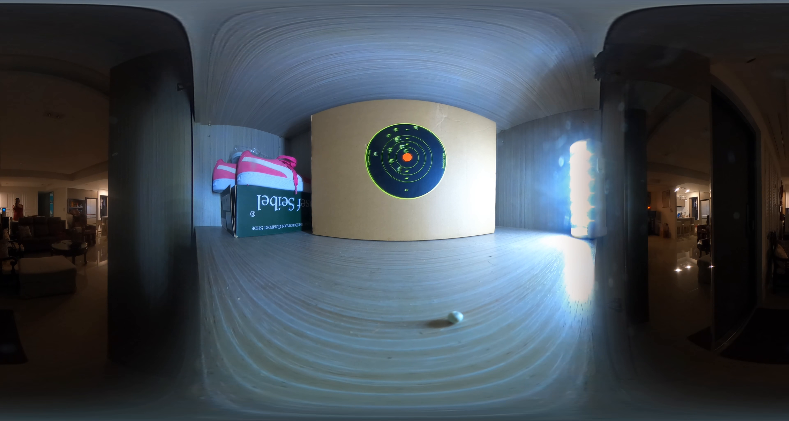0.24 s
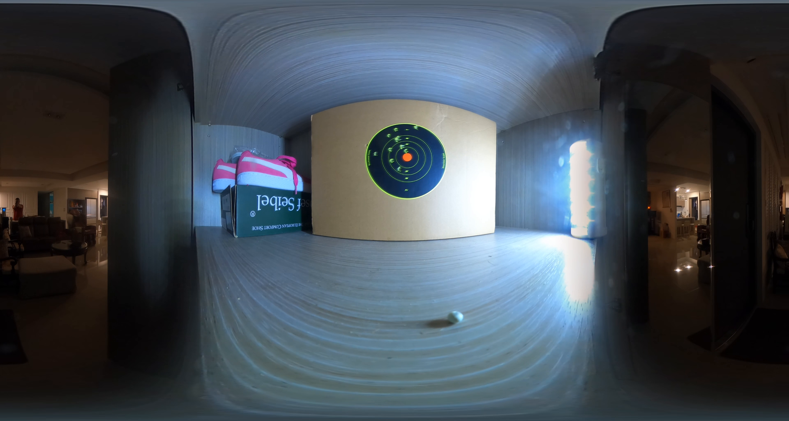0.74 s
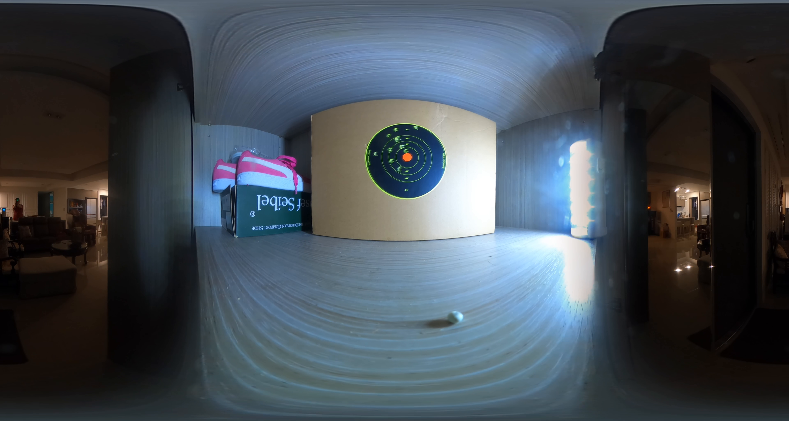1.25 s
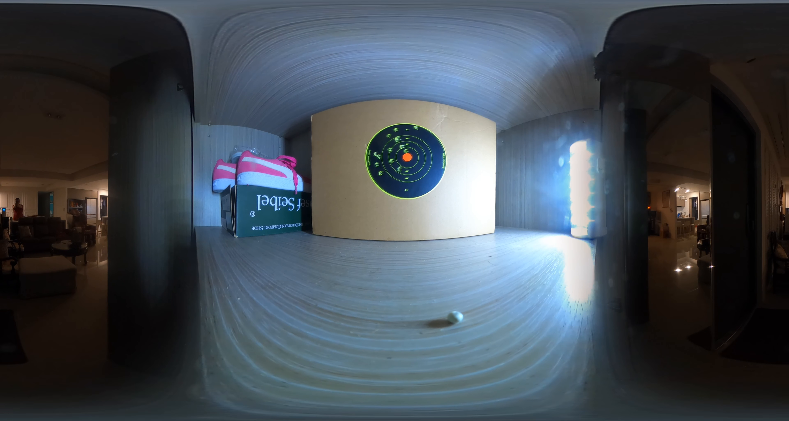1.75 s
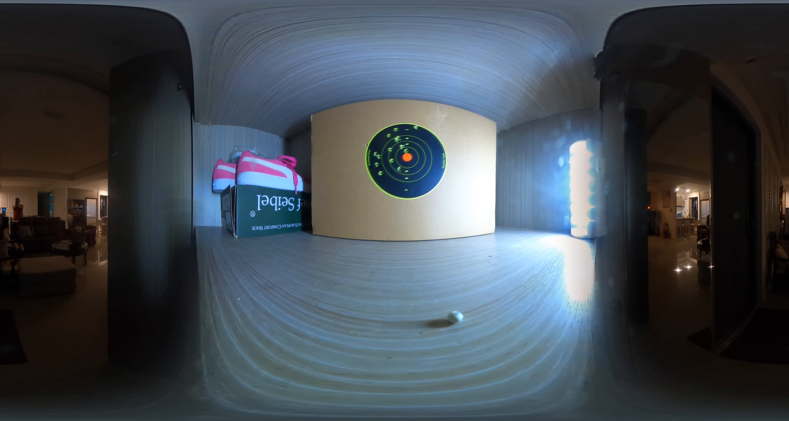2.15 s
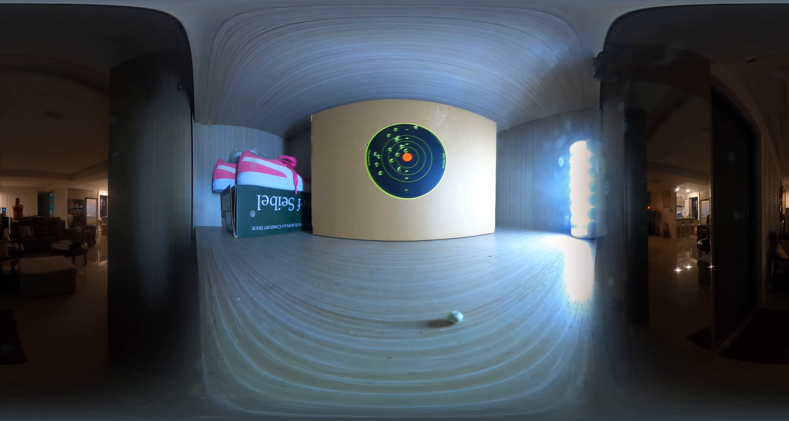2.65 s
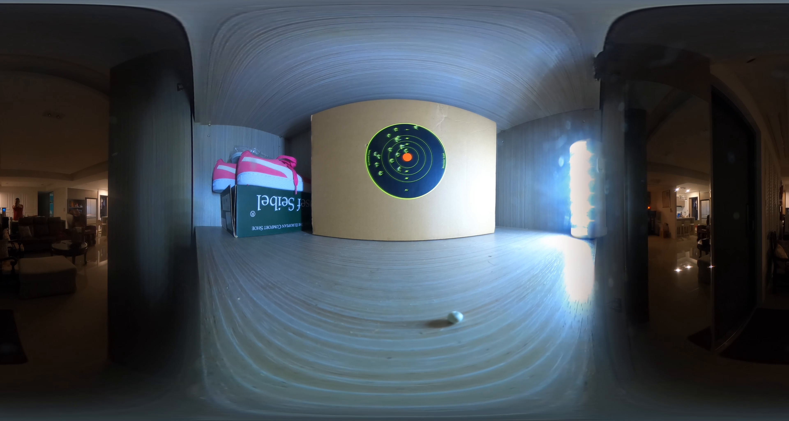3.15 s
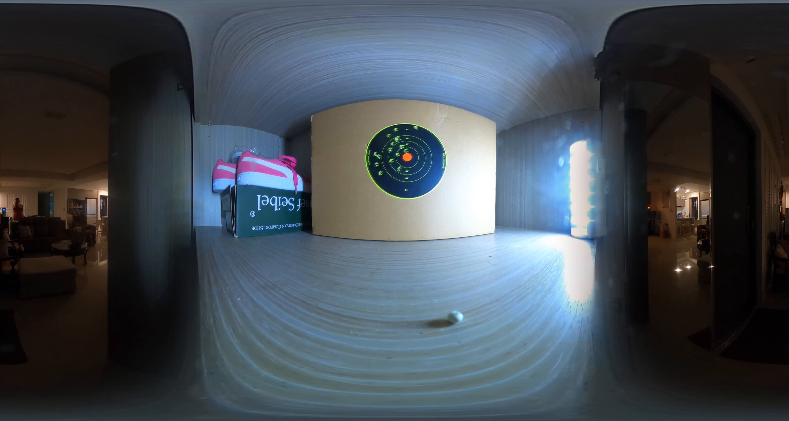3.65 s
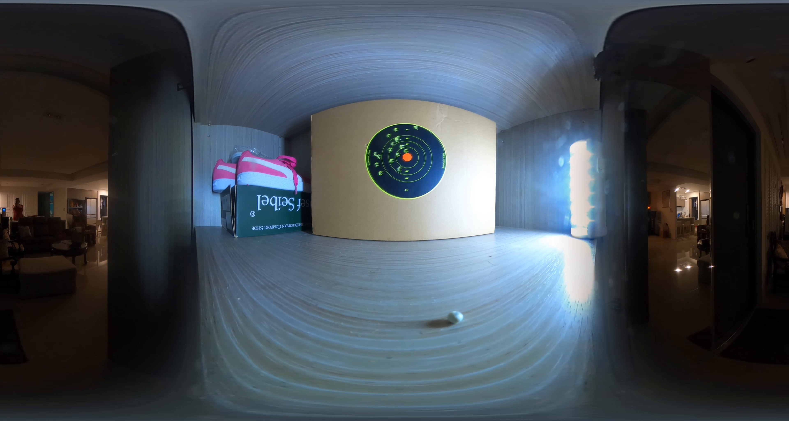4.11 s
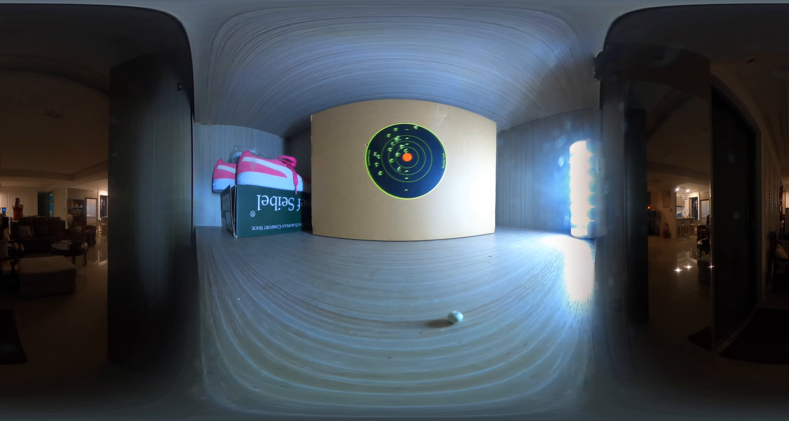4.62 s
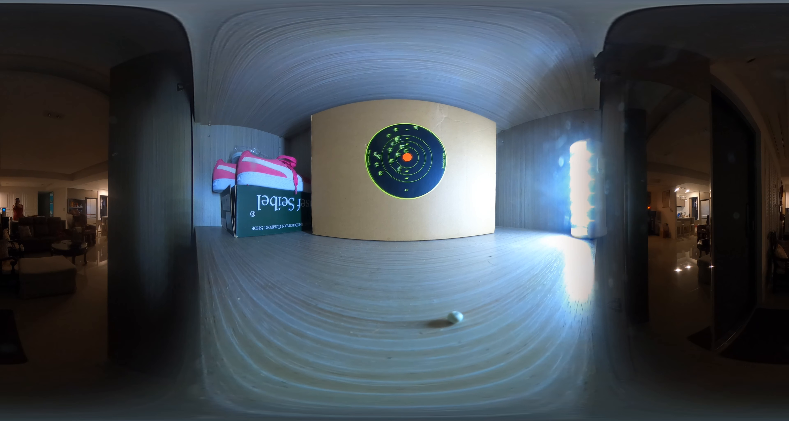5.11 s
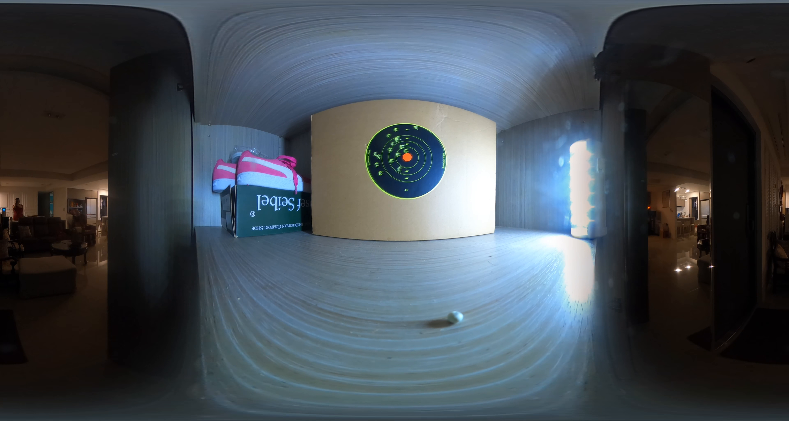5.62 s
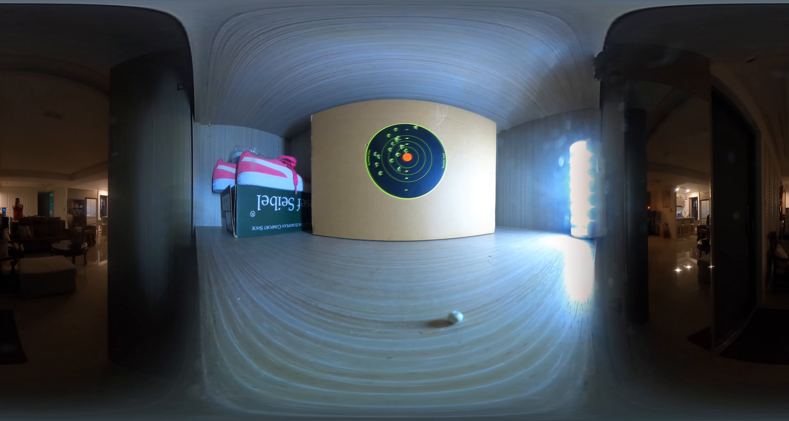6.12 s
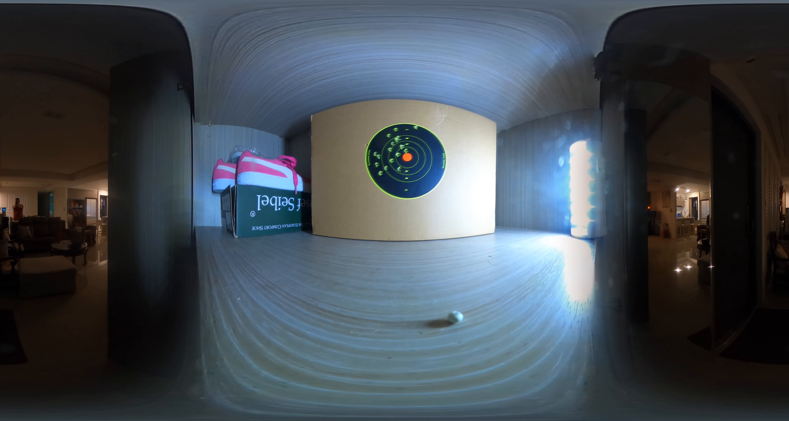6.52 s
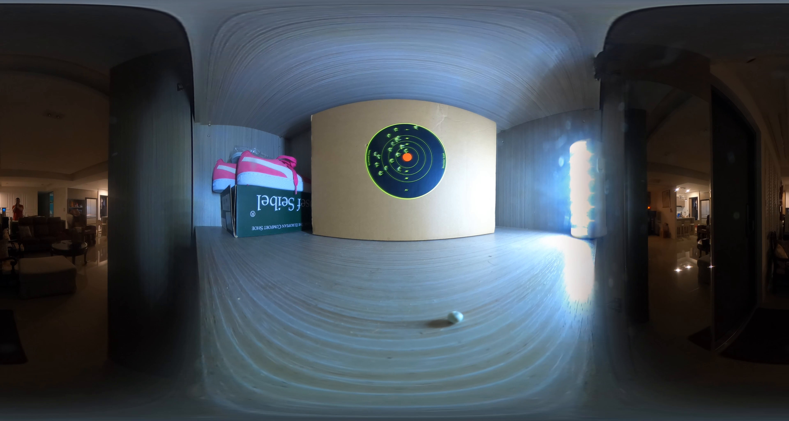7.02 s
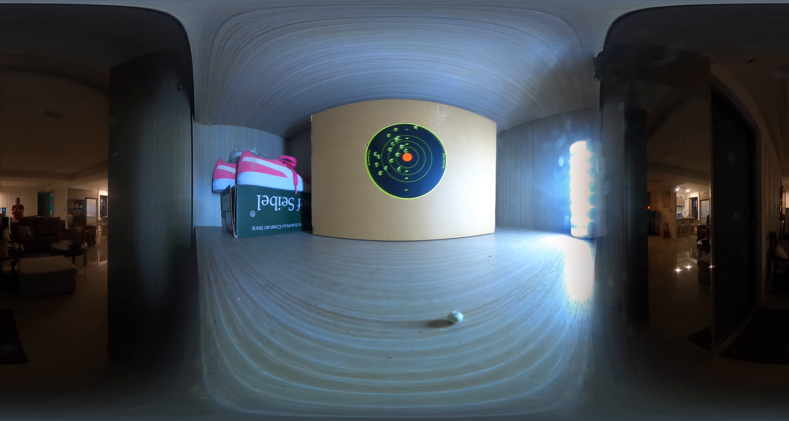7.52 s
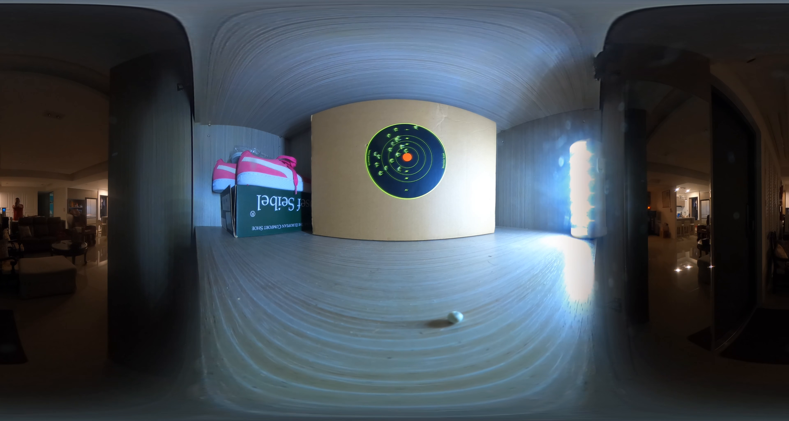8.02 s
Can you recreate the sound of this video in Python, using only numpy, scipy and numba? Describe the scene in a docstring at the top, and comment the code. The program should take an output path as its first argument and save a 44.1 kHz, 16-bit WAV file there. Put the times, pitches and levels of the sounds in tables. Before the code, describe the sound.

A quiet house interior with soft low air noise, faint steady hum and swelling deep rumble, the last trace of an earlier shot fading at the start. A soft low drone climbs around 0.6-1.4 s. Airsoft shots come at about 1.4, 1.6, 1.8, 2.4, 3.7, 4.6 and 6.5 s. Each is a dull, slightly metallic pop with a small rattle, then about 0.05 s later a very loud, dry paper crack and hollow cardboard boom, clipped at the close microphone. The room tail ducks and swells back, dying in about half a second. Pellets knock and bounce on a board from 2.0 to 3.3 s, brightest around 2.5-2.8, with a faint roll dulling until 3.7; a few soft taps follow near 4 and 4.8-5 s. Another low drone rises at 5.2-6.5 s. After the last hit, only rumble and slowly lifting hum remain until 8.3 s.

```python
"""An airsoft gun fires across a living room at a paper target on a cardboard box beside a small camera.
Each shot is a dull muzzle pop, then the pellet's snap on the box, built from fading noise and ringing tones.
Spent pellets bounce and roll on a board; air noise, hum, rumble and low drones lie underneath.
The camera limits the snaps, so the room tail dips and swells back, and slowly lifts the hum afterwards."""
import sys
import numpy as np
from scipy import signal
from scipy.io import wavfile
from scipy.ndimage import uniform_filter1d
from numba import njit

SR = 44100
rng = np.random.default_rng(int(sys.argv[2]) if len(sys.argv) > 2 else 0)


def wrap_up_sound(samples):
    """Save the sound to the file named by the first command line argument, as 16-bit audio."""
    columns = np.atleast_2d(samples).T
    # keep every value between -1 and 1, then stretch to whole-number steps
    tamed = np.clip(columns, -1, 1)
    steps = np.round(tamed * 32767).astype(np.int16)
    wavfile.write(sys.argv[1], SR, steps)


N = 364247  # length in samples
LEAD = SR // 2  # samples worked out before the start, for an earlier shot's tail
THIRDS = 50 * 2 ** np.arange(0, 8.4, 1 / 3)  # middles of the noise bands in Hz, a third of an octave apart

# All levels are those before the camera's gain.
# The shots. Each row: muzzle pop in seconds, pellet on target in seconds, pop level in dB,
# shell thump in dB, paper crack peak in dB, box boom in dB, boom tilt in dB an octave.
SHOTS = [(-.40, -0.358, -30, -12, 21.5, -2.5, 0), (1.3562, 1.3994, -13, -8.5, 20.5, 11, -3),
         (1.5994, 1.646, -11.5, -7, 20.5, 14, -3.5), (1.7764, 1.8224, -15, -11.5, 22, 15, -0.5),
         (2.4047, 2.4495, -11.5, -14, 22.5, 15, 4), (3.676, 3.7223, -11.5, -12, 21.5, 15.5, 3.5),
         (4.5692, 4.6145, -10.5, -14, 23, 13, 0.5), (6.4861, 6.5339, -13, -9.5, 23.5, 17.5, -3.5)]
# Pellet bounces on the board. Each row: start in seconds, peak in dB, hardness (0 soft to 1 hard).
BOUNCES = [(1.984, -6.5, 0.8), (2.127, -22.5, 0.02), (2.1601, -10, 0.14), (2.258, -28, 0),
           (2.2731, -15, 0.49), (2.3464, -15.5, 0.67), (2.385, -27, 0.16), (2.474, 0, 0.3),
           (2.558, -11.5, 0.5), (2.61, -8, 0.8), (2.673, -5, 0.7), (2.808, -14.5, 0.7), (2.824, -6, 1),
           (2.938, -11, 0.66), (3.001, -13, 0.96), (3.024, -19.5, 0.7), (3.08, -33, 0.7), (3.106, -29, 0.7),
           (3.156, -26.5, 0.6), (3.265, -35.5, 0.4), (3.595, -44, .5), (3.914, -19.5, 0),
           (3.971, -28.5, 0.3), (4.014, -24.5, 0), (4.041, -27.5, 0.02), (4.078, -36, 0.07),
           (4.744, -25, 0), (4.80, -24, 0), (5.044, -34.5, 0)]
# Crack of the paper, too dense for single tones; it also colours the faint noise before each pop.
# Each row: frequency in Hz, relative level in dB, time to fall by 60 dB in seconds.
PAPER_CRACK = [(300, -4.5, 0.037), (570, -10.5, 0.04), (925, 2, .03), (1380, -10, 0.036), (2160, 3, 0.016),
               (3030, 1, 0.017), (3870, -5.5, 0.015), (6100, -14, .012), (9200, -24.5, 0.022),
               (15000, -30.5, .006)]
# Ringing tones of the barrel, and of the cardboard box.
# Each row: frequency in Hz, relative level in dB, time to fall by 60 dB in seconds.
BARREL_TONES = [(438.5, -6, 0.052), (820, -0.5, 0.013), (1472.4, -3, 0.06), (2099, 1, 0.084),
                (3350, -5.5, 0.052), (4270, -7.5, 0.017)]
BOX_TONES = [(60, -9, 0.12), (123, 0, 0.029), (188, 0.5, .06), (88.75, -2.5, 0.29), (103.5, -7.5, 0.24),
             (129, -11, 0.27), (159.7, -1, 0.19), (220, -3.5, 0.083), (246, 4.5, 0.093),
             (300.5, -9.5, 0.081), (410, -12.5, .06), (494, -16.5, 0.093)]


def undb(db):
    """Turn decibels into a gain."""
    return 10 ** (np.asarray(db) / 20)


def level(x, db):
    """Scale a sound to an average (rms) level."""
    return x * undb(db) / np.sqrt(np.mean(x ** 2))


def peak(x, db):
    """Scale a sound so that its highest point has this level."""
    return x * undb(db) / np.abs(x).max()


def column(table, hz, k):
    """Read column k of a frequency table, filling in between rows on a log frequency axis."""
    rows = np.array(table)
    return np.interp(np.log(np.maximum(hz, 1)), np.log(rows[:, 0]), rows[:, k])


def add(track, s, x):
    """Mix a sound into the track at a time in seconds."""
    i = int(s * SR) + LEAD
    track[i:i + len(x)] += x[:len(track) - i]


def walk(rate):
    """A smooth random wander: a new value is drawn rate times a second, then smoothed twice."""
    k = int(SR / rate)
    steps = np.repeat(rng.standard_normal(N // k + 1), k)
    return 0.43 * uniform_filter1d(uniform_filter1d(steps, k), k)[:N]


def noise_band(low_hz, high_hz, order, samples):
    """Random noise kept only between two frequencies."""
    sos = signal.butter(order, [low_hz, high_hz], "band", fs=SR, output="sos")
    return signal.sosfilt(sos, rng.standard_normal(samples))


def bands():
    """Unrelated third-octave noises, two seconds each, from which the bursts are cut."""
    noises = [noise_band(hz / 1.14, hz * 1.14, 2, 2 * SR) for hz in THIRDS]
    return np.array(noises, dtype=np.float32)


def burst(noises, table, length_s, rise_s, hold_s=0., tilt_db=0.):
    """Noise whose bands die at their own rates after a hold; tilt in dB an octave acts above 700 Hz."""
    t = np.arange(int(length_s * SR), dtype=np.float32) / SR
    start = rng.integers(0, SR)
    db = column(table, THIRDS, 1) + tilt_db * np.log2(np.maximum(THIRDS / 700, 1))
    power = np.sum(undb(2 * db) * np.var(noises[:, ::41], axis=1))
    gain = np.float32(undb(db) / np.sqrt(power))  # rms 1 before the rise and fade
    rate = np.float32(np.log(1000) / column(table, THIRDS, k=2))
    fade = np.exp(-rate[:, None] * np.maximum(t - np.float32(hold_s), 0))
    rise = 1 - np.exp(-t / max(rise_s, 1e-5))
    return gain @ (noises[:, start:start + len(t)] * fade) * rise


def ring(modes, scatter_db, push_s, length_s, detune=.015):
    """One blow: a short rough contact sets off dying tones, each with chance strength and pitch; peak 1."""
    hz, db, t60 = np.transpose(modes)[:, :, None]
    chance = rng.standard_normal((len(modes), 2))
    t = np.arange(int(length_s * SR)) / SR
    hz = hz * (1 + detune * chance[:, :1])
    strength = undb(db + scatter_db * chance[:, 1:])
    body = np.sum(strength * np.sin(2 * np.pi * hz * t) * 1000. ** (-t / t60), axis=0)
    push = (1 + 0.47 * rng.standard_normal(400)) * np.exp(-t[:400] / max(push_s, 1e-5))
    out = np.convolve(body, push)
    return out / np.abs(out).max()


def room(noises, wet_db, length_s, rise_s=.003):
    """The blurred tail after a blow: reflections thicken, then each band dies at its own rate."""
    # Room tail. Each row: frequency in Hz, relative level in dB, time to fall by 60 dB in seconds.
    tail = [(80, 5, 0.47), (210, 8.5, 0.65), (401.3, -4, 0.67), (650, -9, 0.59), (930, -2, 0.67),
            (1500, -3.5, .58), (2300, 0, 0.71), (3200, -2, 0.62), (4500, -8.5, 0.69), (7200, -13.5, 0.58),
            (10800, -22.5, .42), (15100, -33, .36)]
    return undb(wet_db) * burst(noises, tail, length_s, rise_s)


def muzzle_pop(noises, db):
    """The muzzle cracks as a short noise while the barrel rings."""
    # Muzzle crack, too dense for single tones.
    # Each row: frequency in Hz, relative level in dB, time to fall by 60 dB in seconds.
    muzzle = [(200, 0.5, 0.014), (400, -1.5, 0.029), (565, -15, 0.019), (790, 0, 0.17), (1480, -6.5, 0.012),
              (2110, -3.5, 0.037), (2980, -9.5, 0.019), (4860, -3.5, 0.074), (6532, -10, 0.1),
              (9600, -13, .02), (15000, -28.5, .02)]
    barrel_db = 4
    crack = 0.86 * burst(noises, muzzle, .06, 0.00058, 0.0038)
    barrel = undb(barrel_db) * ring(BARREL_TONES, 1.2, 0.00034, 0.051)
    return undb(db) * (crack + barrel[:len(crack)])


def rattle(out, s, db):
    """Loose parts knock on the barrel after the pop, at uneven moments and strengths."""
    rattle_db, scatter_db = -7, 6  # typical strength relative to the pop, and its spread
    span_s, knocks = .04, 5
    for k in range(knocks):
        when = span_s * (k + 1 + rng.random()) / (knocks + 1)
        knock_db = db + rattle_db + scatter_db * rng.standard_normal()
        add(out, s + when, undb(knock_db) * ring(BARREL_TONES, 12, 0.00011, 0.028))


def gun(noises):
    """A faint noise swells in, then the pop and the shell's thump; parts rattle; walls repeat the pop, duller."""
    # Ringing tones of the shell.
    # Each row: frequency in Hz, relative level in dB, time to fall by 60 dB in seconds.
    shell = [(59, -9.5, 0.12), (96, 0, 0.21), (148.3, -5, 0.3), (287, -6, 0.11)]
    # First walls to return the pop. Each row: delay in seconds, level relative to the pop in dB.
    echoes = [(0.0134, -1.5), (.022, -4), (.031, 0), (.038, -5.5)]
    lead_in_db, lead_in_s = -14.5, .008  # short faint noise that swells into the pop
    wet_db = -5.5  # room tail relative to the pop
    out = np.zeros(N + LEAD)
    for s, _, db, thump_db, *_ in SHOTS:
        pop = muzzle_pop(noises, db)
        lead_in = burst(noises, PAPER_CRACK, lead_in_s, 1e-5)[::-1]  # a fading burst, turned backwards
        add(out, s - lead_in_s, undb(db + lead_in_db) * lead_in)
        add(out, s, pop)
        add(out, s, undb(thump_db) * ring(shell, 2.8, .00064, .25))
        add(out, s, room(noises, db + wet_db, .9, rise_s=.012))
        for lag, echo_db in echoes:
            add(out, s + lag, undb(echo_db) * uniform_filter1d(pop, size=3))
        rattle(out, s, db)
    return out


def target(noises):
    """The paper cracks for a few milliseconds; the loose box booms deeper or higher with the place hit."""
    wet_db = -37.5  # room tail relative to the crack's peak
    out = np.zeros(N + LEAD)
    for _, s, _, _, db, boom_db, tilt_db in SHOTS:
        add(out, s, peak(burst(noises, PAPER_CRACK, 0.055, .0001, 0.001), db))
        struck = [(hz, mode_db + tilt_db * np.log2(hz / 150), t60) for hz, mode_db, t60 in BOX_TONES]
        add(out, s + 0.003, undb(boom_db) * ring(struck, 2.2, 0.00019, .4, detune=.06))
        add(out, s, room(noises, db + wet_db, .9))
    return out


def pellets(noises):
    """Bounces knock on the board; softer contacts are duller and deeper and also sound the box."""
    # Noise of a contact with the board, then the ringing tones of its knock.
    # Each row: frequency in Hz, relative level in dB, time to fall by 60 dB in seconds.
    board = [(90.37, -31, .05), (170, -10.5, 0.1), (297.5, -5.5, 0.056), (557, 7.5, 0.058),
             (890, 0.5, 0.046), (1503, 4, 0.032), (2010, -5.5, 0.021), (2880, -5.5, 0.035),
             (3800, -15, 0.028), (5980, -28, .02), (11970, -49, 0.011)]
    knock = [(294, -8, 0.051), (650, -1.5, 0.02), (950, -3.5, 0.013), (1460, 5.5, 0.026),
             (1880, -1.5, 0.043), (2760, -8, 0.016)]
    wet_db, knock_db = -40, -9.5  # relative to the bounce
    thud_db, thud_db_per_hardness = -3.5, -35.5
    out = np.zeros(N + LEAD)
    for s, db, hard in BOUNCES:
        contact = burst(noises, board, .08, .0002, 0.00065, tilt_db=-8 * (0.48 - hard))
        add(out, s, peak(contact, db))
        add(out, s, room(noises, db + wet_db, 0.38))
        push_s = 0.00017 * (1.2 - min(hard, 1))  # a soft contact lasts longer
        add(out, s, undb(db + knock_db) * ring(knock, 3, push_s, .08))
        thud = ring(BOX_TONES, 2, 0.0004, 0.11)
        thud = thud * np.exp(-np.arange(len(thud)) / SR / 0.014)
        add(out, s, undb(db + thud_db + thud_db_per_hardness * hard) * thud)
    return out


def roll(start_s):
    """A rolling pellet: a bumpy rain of tiny contacts in the board's resonances, stirred by each hop."""
    # Resonances under the pellet. Each row: frequency in Hz, width in Hz, relative level in dB.
    resonances = [(522.4, 89, 2.5), (666.5, 180, 3), (1000, 140, -1.5), (1240, 120, 1.5), (1500, 150, 0),
                  (1870, 120, -4.5), (2372, 120, -15)]
    end_s, settle_s = 3.70, 0.051
    hop_db, steady_db = -45, -49  # just after a hop, and between hops
    tilt_db_oct, dulling_db_oct_s = 8.5, -25.5  # treble tilt at the start, and its change each second
    t = np.arange(int((end_s - start_s) * SR)) / SR
    grit = rng.standard_normal(N) * undb(2.5 * rng.exponential(size=N))
    bumps = undb(2 * walk(58.58))
    grit = (grit * bumps)[:len(t)]
    tilt_db, out = tilt_db_oct + dulling_db_oct_s * t, 0
    for hz, width, db in resonances:
        b, a = signal.iirpeak(hz, hz / width, fs=SR)
        tone = signal.lfilter(b, a, signal.lfilter(b, a, grit))  # twice: steep skirts
        out = out + undb(db + tilt_db * np.log2(hz / 600)) * tone
    hops = [s - start_s for s, _, _ in BOUNCES if start_s - .01 < s < end_s]
    stir = np.max([(t > s) * np.exp(-np.abs(t - s) / settle_s) for s in hops], axis=0)
    return level(out, 0) * undb(steady_db + (hop_db - steady_db) * stir)


def drones():
    """Soft wavering low tones that swell, climb in pitch and fade out."""
    # Each row: start in seconds, length in seconds, first pitch in Hz, last pitch in Hz,
    # rms level at the top of the swell in dB, before the wavering.
    tones = [(0.603, .8, 58.4, 72.16, -51), (5.15, 1.35, 46.6, 66.23, -48)]
    out, waver = np.zeros(N + LEAD), undb(2.3 * walk(4.6))
    for s, length_s, from_hz, to_hz, db in tones:
        u = np.arange(int(length_s * SR)) / (length_s * SR)  # runs from 0 to 1
        hz = from_hz + (to_hz - from_hz) * np.sqrt(u)
        swell = np.sqrt(np.sin(np.pi * u))
        add(out, s, np.sqrt(2) * undb(db) * swell * np.sin(2 * np.pi * np.cumsum(hz) / SR))
    return out[LEAD:] * waver


def air_noise():
    """Steady noise in half-octave bands whose levels flicker gently."""
    # Tone colour of the air noise. Each row: frequency in Hz, relative level in dB per Hz.
    colour = [(41, -31), (66, -15.5), (95, -9), (190, -23.5), (330, -24), (541, -37.5), (760, -37),
              (1050, -30), (2490, -38), (7160, -54), (12000, -77)]
    air = 0
    for hz in 90 * 2 ** np.arange(0, 7.1, .5):
        band = noise_band(hz / 1.19, hz * 1.19, 2, N)
        air = air + undb(column(colour, hz, 1) + 1.0 * walk(9.4)) * band
    return level(air, -56)


def appliance_hum():
    """Steady tones whose levels waver a little."""
    # Each row: frequency in Hz, rms level in dB, before the wavering.
    tones = [(301.5, -64.5), (893.6, -82), (1125, -76.5), (1949, -80)]
    t = np.arange(N) / SR
    return sum(np.sqrt(2) * undb(db + 1.2 * walk(6)) * np.sin(2 * np.pi * hz * t) for hz, db in tones)


def building_rumble():
    """Deep noise that swells slowly, and is shaken up by each hit on the box."""
    # Slow swell of the rumble. Each row: time in seconds, level in dB.
    swell = [(0, -37.5), (.6, -39), (1.3, -31.5), (2.0, -40), (4.3, -42), (5.2, -43), (6.0, -37),
             (6.9, -44.5), (8.26, -42.5)]
    middle_hz, width_hz = 37, 36
    shake_db, shake_t60_s = -34.5, 0.36  # level relative to the boom, and time to fall by 60 dB
    t = np.arange(N) / SR
    rumble = noise_band(middle_hz - width_hz / 2, middle_hz + width_hz / 2, 3, N)
    gain = undb(np.interp(t, *np.transpose(swell)))
    for _, s, _, _, _, boom_db, _ in SHOTS:
        after = t - s
        gain = gain + (after > 0) * undb(boom_db + shake_db - 60 * np.abs(after) / shake_t60_s)
    return level(rumble, 0) * gain


def scene():
    """Shots, pellets and their tails over the house noise."""
    noises = bands()
    hits = gun(noises) + target(noises) + pellets(noises)
    roll_start_s = 3.02
    add(hits, roll_start_s, roll(roll_start_s))
    house = air_noise() + appliance_hum() + building_rumble()
    return (hits[LEAD:] + house + drones())[None]


@njit
def ride(x, ceiling, attack, release, loud, sink, climb, depth, slow):
    """Slow gain sinks while it is loud and creeps back; a quick limiter follows it. Both gains in dB."""
    y, fast, env = np.empty(len(x)), 0., 0.
    for i in range(len(x)):
        v = x[i] * 10 ** (slow / 20)
        env = max(abs(v), env * .998)  # loudness: jumps up, falls gradually
        db = 20 * np.log10(env + 1e-9)
        slow = max(slow - sink, -depth) if db > loud else min(slow + climb, 0.)
        headroom = ceiling - 20 * np.log10(abs(v) + 1e-9)
        fast = fast + (headroom - fast) * attack if headroom < fast else min(fast + release, 0.)
        y[i] = v * 10 ** (fast / 20)
    return y


def record(dry):
    """The microphone loses the deepest bass; gain control, overload near full scale, and the top cut off."""
    ceiling_db, attack_s, release_db_s = -1.5, .0001, 79.5  # quick limiter
    # slow gain: threshold, sink and climb in dB a second, deepest cut, gain at the start
    loud_db, sink_db_s, climb_db_s, depth_db, start_db = -16.5, 121., 3.5, 7., -6.5
    overload, top_hz = .88, 15400  # clipping point as a share of full scale
    x = signal.sosfilt(signal.butter(1, 25, "high", fs=SR, output="sos"), dry[0])
    y = ride(x, ceiling_db, 1 / (attack_s * SR), release_db_s / SR,
             loud_db, sink_db_s / SR, climb_db_s / SR, depth_db, start_db)
    clipped = np.clip(y, -overload, overload)
    return signal.sosfilt(signal.ellip(10, .2, 90, top_hz, fs=SR, output="sos"), clipped)[None]


dry = scene()
out = record(dry)
wrap_up_sound(out)
```